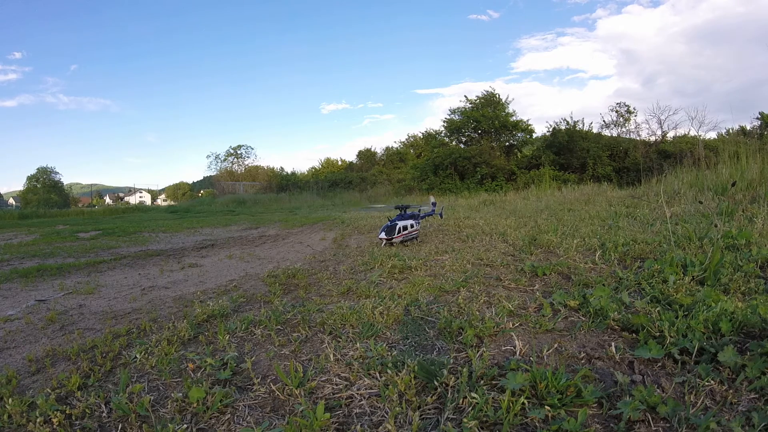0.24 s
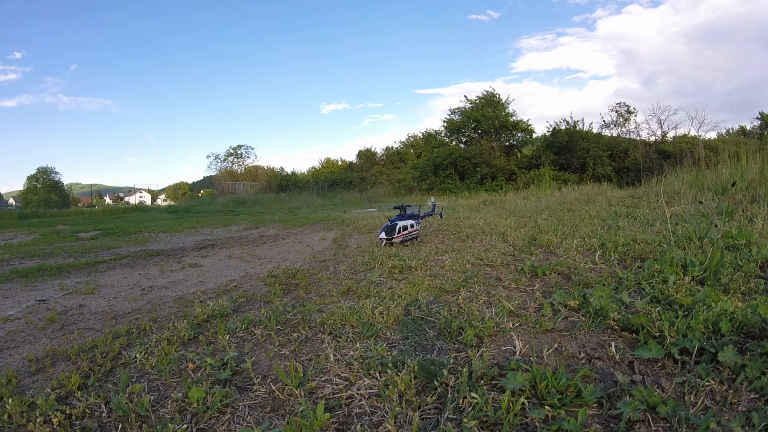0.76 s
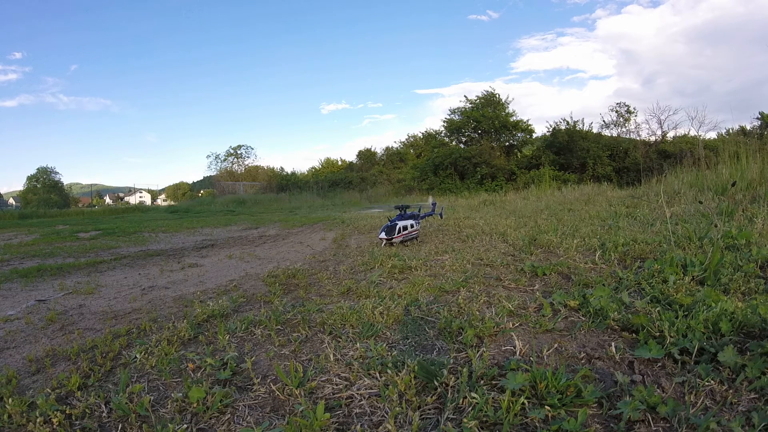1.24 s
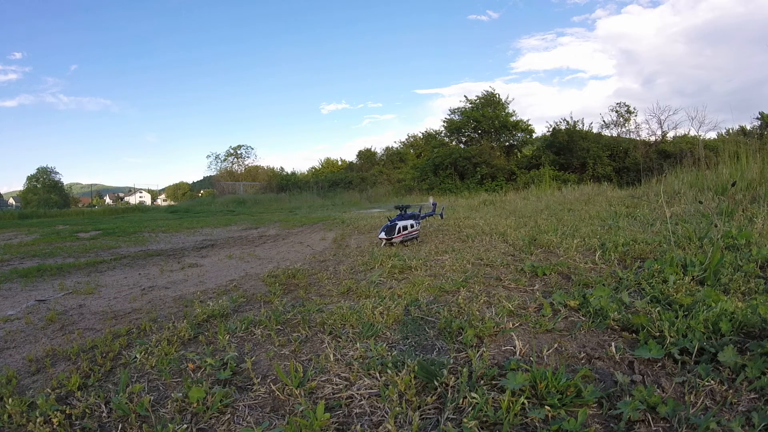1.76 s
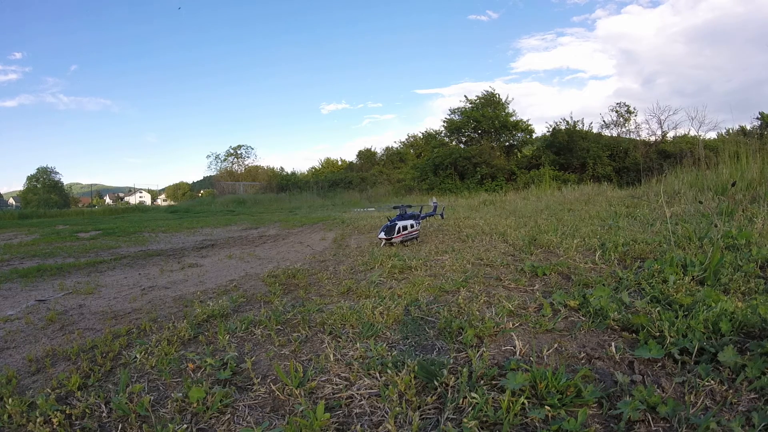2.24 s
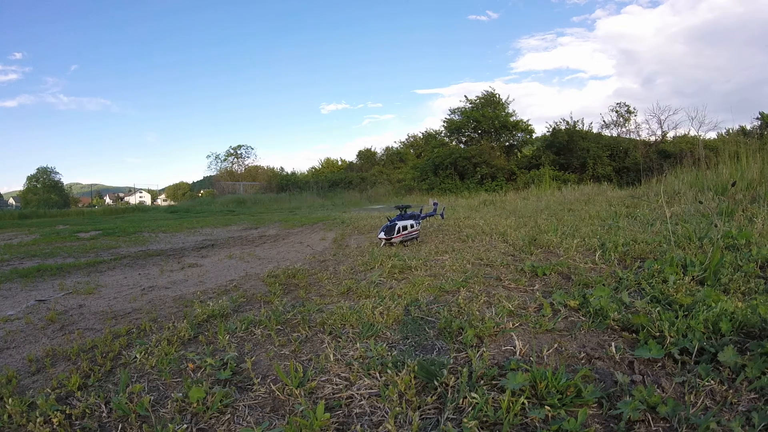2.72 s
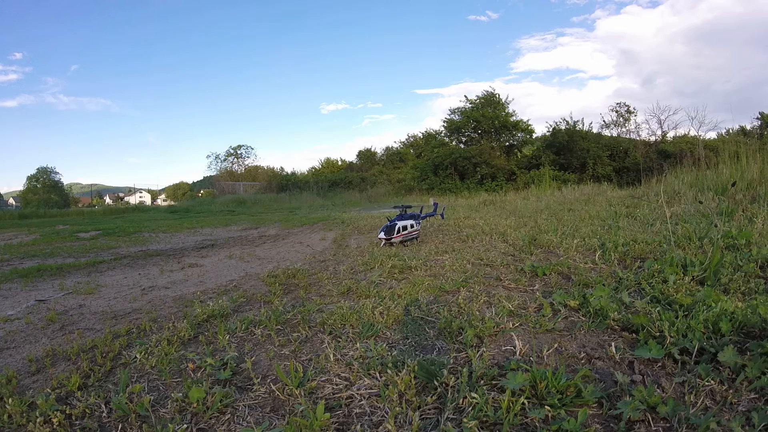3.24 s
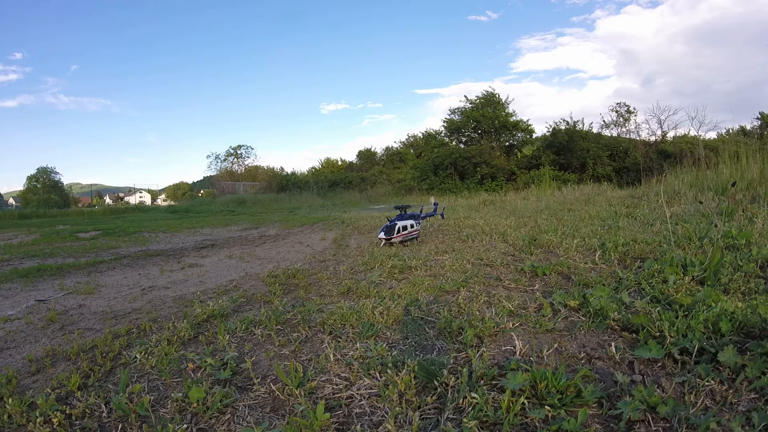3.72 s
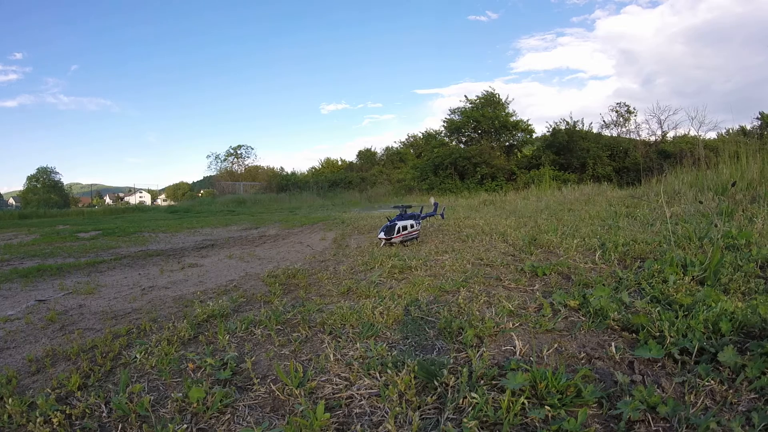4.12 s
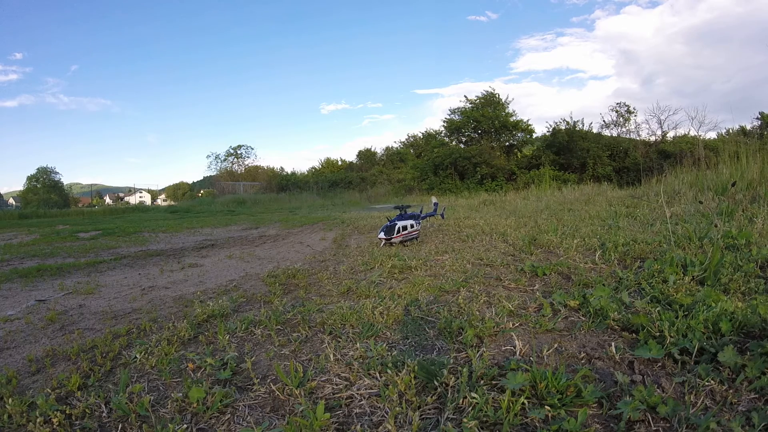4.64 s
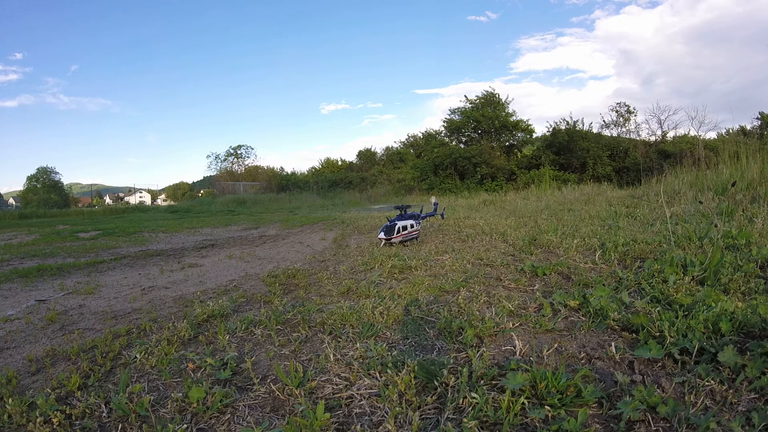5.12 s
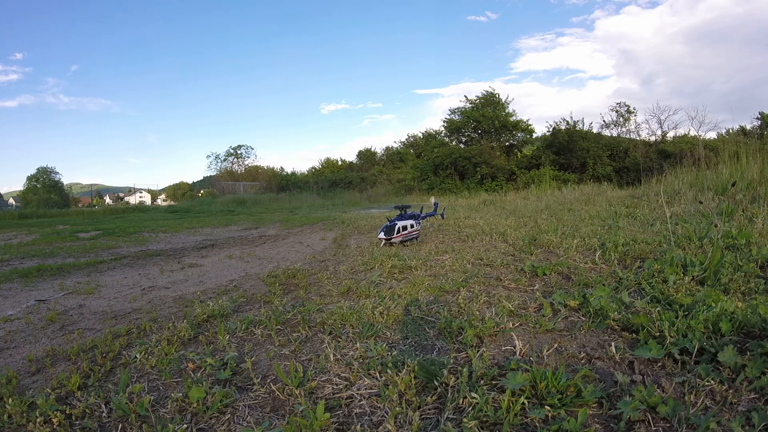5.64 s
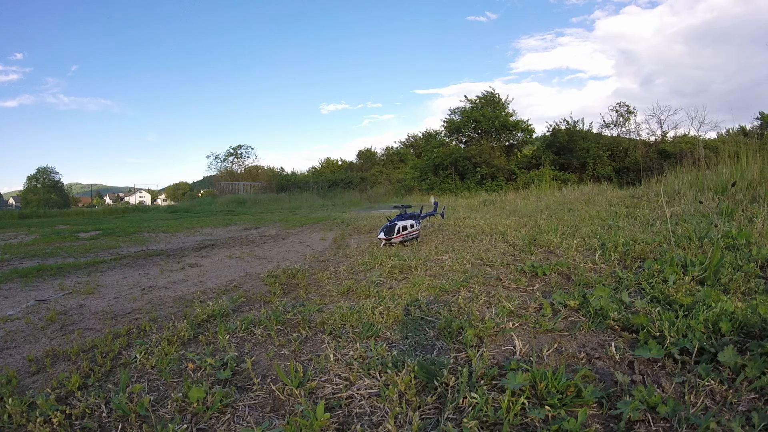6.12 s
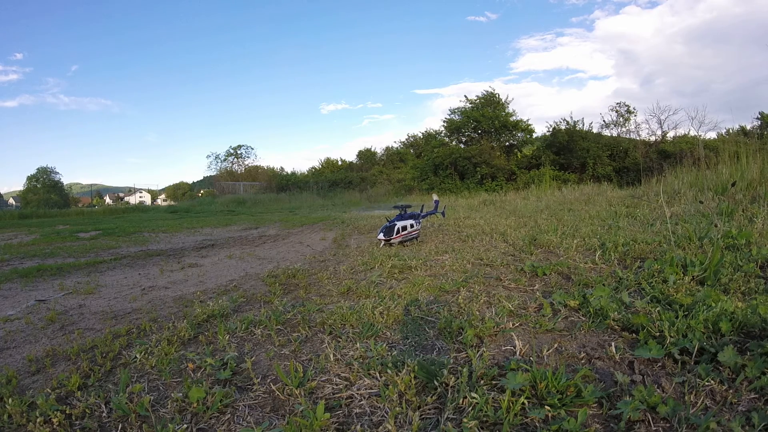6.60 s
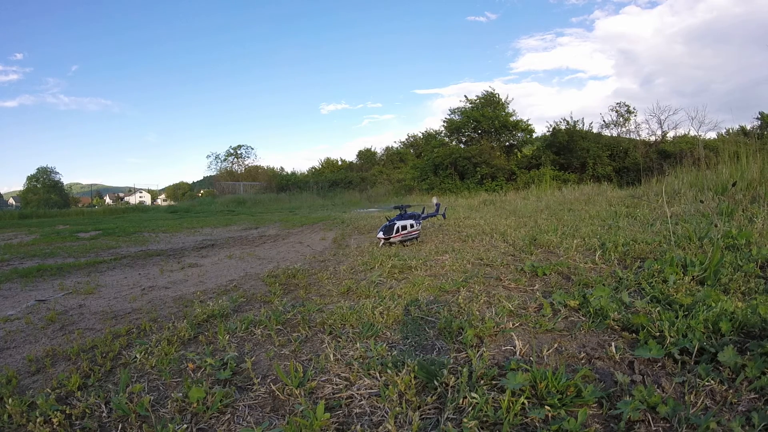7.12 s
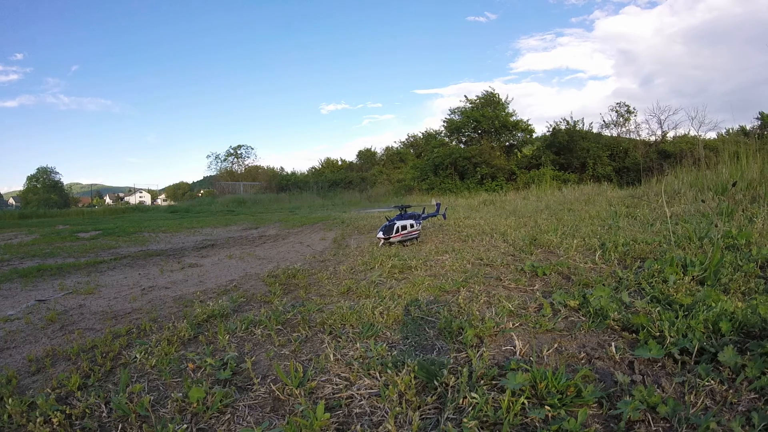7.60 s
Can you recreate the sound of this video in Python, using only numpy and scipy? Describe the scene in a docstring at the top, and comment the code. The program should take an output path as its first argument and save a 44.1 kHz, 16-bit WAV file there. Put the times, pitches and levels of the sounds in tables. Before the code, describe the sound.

A small electric model helicopter spins up on an open grassy field, heard in mono over faint, low wind. From the start its motor is already turning, with a quiet whine that climbs in pitch and grows much louder, rich in overtones. High gear whines, a light body rattle and the airy rush of the blades build with it. At about 2 seconds the fainter, humming tail motor adds a thin high whine that stutters and sags repeatedly until about 5 seconds, slowing slightly. From about 4 to 6 seconds the gears grind harder, with a bright, fluttering hiss. At around 6.5 seconds the main motor levels off, more than an octave above where it began, and holds a steady whine over the rotor wash. Its tone swells slightly in the last half second, just before 8 seconds.

```python
"""A small electric model helicopter spins up on grass, over low wind and a thin controller tone.
The main motor climbs from the start, singing at orders of its shaft speed, loudest at its seven magnet
pairs; blades and gears add noise coloured by the plastic body. At 1.9 s the separate, humming tail motor
takes load, then stutters and slows. The gearbox grinds harder from 3.8 s to about 6 s. Soon after, the
main motor levels off, and its magnet tone swells at the very end."""
import sys
import numpy as np
from scipy import signal
from scipy.fft import rfft, irfft, next_fast_len
from scipy.io import wavfile
from scipy.ndimage import uniform_filter1d, map_coordinates

SR = 44100
rng = np.random.default_rng(int(sys.argv[2]) if len(sys.argv) > 2 else 0)


def int16_out(signal):
    """Quantize to a 16-bit WAV file."""
    q = np.round(np.clip(np.atleast_2d(signal).T, -1, 1) * 32767)
    wavfile.write(sys.argv[1], SR, q.astype(np.int16))


N = 346626
TIME = np.arange(N) / SR
STEP = 64  # samples between updates of slow gains
MAGNET_PAIRS, FULL_SPEED = 7, 77  # main motor; speeds are in turns/s throughout

# noise layers before colouring, by name: level at full speed/(dB per Hz), loss per halving of speed/dB
NOISE_LEVELS = {"wash": (-64.5, 5.4), "rattle": (-76, 4.7), "gears": (-92.5, 3.1), "swish": (-107, 18),
                "chop": (-81, 13), "grind": (-104, 4)}


def amp(db):
    """Gain of a level in dB."""
    return 10 ** (np.asarray(db) / 20)


def along(points, hz):
    """Read (f/Hz, value) points on a log frequency axis."""
    freqs, values = np.transpose(points)
    return np.interp(np.log(hz + 1), np.log(freqs + 1), values)


def curves(rows):
    """One envelope for each column after the time."""
    times, *columns = np.transpose(rows)
    return [np.interp(TIME, times, column) for column in columns]


def wobble(rate):
    """A random drift through rate knots a second."""
    knots = rng.standard_normal(int(N * rate / SR) + 4)
    return map_coordinates(knots, [TIME * rate], order=1)


def tone(cycles):
    """A sine of rms 1 with a random starting phase."""
    return np.sqrt(2) * np.sin(2 * np.pi * (cycles + rng.random()))


def filtered(x, response):
    """Equalise x with a gain given as a function of frequency."""
    size = next_fast_len(N + SR // 4)
    return irfft(rfft(x, size) * response(np.fft.rfftfreq(size, 1 / SR)), size)[:N]


def rush(colour, patchy_db):
    """Noise of 0 dB per Hz with patches of random gain, then coloured."""
    spectrum = signal.stft(rng.standard_normal(N + 512), nperseg=512)[2]
    patches = uniform_filter1d(rng.standard_normal(spectrum.shape), 5, axis=0)
    patches = uniform_filter1d(patches, 10, axis=1)
    white = signal.istft(spectrum * amp(patchy_db * patches / patches.std()), nperseg=512)[1][:N]
    return filtered(white / white.std() * np.sqrt(SR / 2), lambda hz: amp(along(colour, hz)))


def noise_db(name, speed, full_from=FULL_SPEED):
    """Level of a noise layer, growing with shaft speed up to full_from."""
    full_db, loss_db = NOISE_LEVELS[name]
    return full_db + loss_db * np.log2(np.minimum(speed, full_from) / full_from)


def strain(remains=0):
    """Envelope of the spell of heavier grinding: rises to 1, holds, falls to the share that remains."""
    return np.interp(TIME, [3.8, 4.15, 5.68, 6.08], [0, 1, 1, remains])


def ringing(modes, order, speed, floor_db):
    """Gain of one shaft order as it sweeps through a set of resonances, over a floor."""
    coarse = speed[::STEP]
    halvings = np.log2(coarse / FULL_SPEED)
    power = amp(floor_db) ** 2
    for hz, width, db, loss_db in modes:
        detuning = 2 * (order * coarse - hz) / width
        power += (amp(db + loss_db * halvings) / (1 + detuning ** 2)) ** 2
    return np.interp(TIME, TIME[::STEP], np.sqrt(power))


def wind():
    """A low, gently gusting bed of wind."""
    # wind spectrum: f/Hz, level/dB
    colour = [(15, -10), (45, -1), (100, -5), (150, -5), (230, -6), (330, -12.5), (500, -61.5)]
    return amp(-74.5 + 1.8 * wobble(2.1)) * rush(colour, patchy_db=2.5)


def controller(hz, level_db):
    """The speed controller switches at a fixed rate: a thin, steady tone."""
    return amp(level_db + 2.2 * wobble(3.3)) * tone(hz * TIME)


def rotor_noise(speed):
    """Rotor wash, frame rattle and blade chop: bands of noise that grow with speed."""
    # low rush of air from the rotor: f/Hz, level/dB
    wash_colour = [(150, -43.5), (230, -20.5), (330, -6), (390, -7), (480, 1), (550, -6), (640, 2.5),
                   (760, -6), (880, -18), (1100, -48)]
    # rattle of the frame: f/Hz, level/dB
    rattle_colour = [(700, -25), (880, -3), (1150, 0.5), (1350, -2), (1500, -8.5), (1750, -1.5), (1900, -1),
                     (2050, -0.5), (2400, -8.5), (2900, -10.5), (3150, -16.5), (3600, -12.5), (3900, -17.5),
                     (4500, -46.5)]
    # patchy midrange of the blades: f/Hz, level/dB
    chop_colour = [(900, -27.5), (1200, -3.5), (1500, 1), (1900, 3), (2400, -6), (2800, -3), (3100, -9),
                   (3600, -35.5)]
    wash = amp(noise_db("wash", speed) - 0.3 * wobble(2.5)) * rush(wash_colour, patchy_db=1.3)
    rattle = amp(noise_db("rattle", speed)) * rush(rattle_colour, patchy_db=0.6)
    chop = amp(noise_db("chop", speed, full_from=74)) * rush(chop_colour, patchy_db=3.0)
    return wash + rattle + chop


def gear_noise(speed, turns, pulse):
    """The gears hiss and grind, pulsing once a turn; the grinding swells under strain."""
    # hiss of the running gears: f/Hz, level/dB
    hiss_colour = [(3200, -44.5), (3900, -3), (4300, 2.5), (4750, -4), (5300, 0), (5700, -2), (6300, 4),
                   (7000, -2.5), (7500, -4), (8000, 0), (8500, -7.5), (9100, -8.5), (9700, -17.5),
                   (11000, -39.5)]
    # grinding in the gearbox: f/Hz, level/dB
    grind_colour = [(3800, -30), (4150, -4), (4350, 4), (4650, -12), (5450, -12), (5650, 6), (5850, 6),
                    (6050, -8), (6500, -2), (6950, 5), (7300, -5), (8000, 0), (8500, -14), (9500, -40)]
    hiss = amp(noise_db("gears", speed)) * rush(hiss_colour, patchy_db=1.5)
    grind = amp(noise_db("grind", speed) + 14.5 * strain()) * rush(grind_colour, patchy_db=1.0)
    return (1 + pulse * tone(turns)) * (hiss + grind)


def swish(speed, turns, pulse):
    """An airy top that pulses twice a turn, lifts with the grinding and keeps most of that lift."""
    # swish spectrum: f/Hz, level/dB
    colour = [(8500, -32), (9700, -5.5), (11000, 0.5), (12400, 2.5), (13600, -5), (14600, -3.5),
              (15100, -6.5)]
    level_db = noise_db("swish", speed, full_from=45) + 6.5 * strain(remains=.75)
    return amp(level_db) * (1 + pulse * tone(2 * turns)) * rush(colour, patchy_db=1.3)


def stutters(recover_s):
    """The tail drive cuts out for moments and the motor sags: drive gain and share of speed lost."""
    # cut-outs: t/s, gap half-width/s, sag/share of speed
    cutouts = [(1.94, 0.0079, 0.046), (2.11, 0.014, 0.028), (2.26, 0.0073, 0.034), (2.45, 0.02, .012),
               (2.63, 0.014, 0.021), (2.829, 0.009, 0.054), (2.90, 0.012, .02), (3.10, 0.0049, 0.043),
               (3.251, .012, 0.039), (3.60, 0.0091, 0.017), (3.92, 0.013, 0.039), (4.071, 0.0079, 0.01985),
               (4.21, .012, 0.014), (4.35, 0.011, 0.027), (4.68, .015, 0.016), (4.92, 0.019, .015),
               (5.22, 0.019, 0.0089)]
    drive, sag = np.ones(N), np.zeros(N)
    for at_s, gap_s, share in cutouts:
        since = TIME - at_s
        drive *= 1 - .9 * np.exp(-(since / gap_s) ** 2)
        sag += share * np.exp(-np.abs(since) / np.where(since > 0, recover_s, .006))
    return drive, sag


def tail_motor(main_turns, load_at_s, throb, coil_order):
    """The tail motor hums; under load the hum dulls and a coil whine rises, throbbing each main turn."""
    # tail speed before the sags: t/s, speed/(turns/s)
    spin = [(0, 170.4), (1.3, 170.3), (1.6, 168.6), (1.88, 165.5), (1.92, 162), (3.55, 161.5),
            (3.65, 159.5), (4.15, 158.7), (4.3, 155), (4.8, 149.5), (5.15, 149), (5.35, 146.5), (5.6, 151),
            (6.72, 150), (6.76, 136), (6.86, 137), (6.96, 143.5), (7.25, 146), (7.45, 141.5), (7.65, 143),
            (7.86, 143)]
    # tail mix: t/s, hum level/dB, fourth order level/dB, sum tone level/dB
    mix = [(0, -45, -68, -42.5), (.7, -44.5, -51, -54), (1.0, -43.5, -42, -46), (1.3, -45.5, -57, -36.5),
           (1.6, -43.5, -49, -40), (1.86, -42.5, -43, -35), (2.4, -42.5, -45, -47), (3.1, -44, -40, -40.5),
           (4.15, -44, -43, -34.5), (4.8, -48, -47.5, -33), (6.7, -47, -47, -39.5), (6.8, -48.5, -54, -35),
           (7.86, -46.5, -58.5, -40)]
    # hum partials: order, relative level/dB
    hum_orders = [(1, -11), (2, -4.5), (3, 0), (5, -19.5), (6, -15), (8, -18), (10, -18.5), (12, -22)]
    # sum tones, tail orders shifted up by the main motor's magnet tone: order, relative level/dB
    sum_orders = [(2, -1), (4, -17.5)]
    # coil whine under load, by its pitch: f/Hz, level/dB
    coil_levels = [(2450, -67), (2580, -60.5), (2640, -61.5), (2680, -56.5), (2705, -55.5), (2740, -55.5),
                   (2790, -54), (2860, -53), (2915, -52.5)]
    speed = curves(spin)[0]
    hum_db, fourth_db, sum_db = curves(mix)
    drive, sag = stutters(recover_s=.055)
    turns = np.cumsum(speed * (1 - sag + .002 * wobble(25))) / SR
    load = np.clip((TIME - load_at_s) / .04 + .5, 0, 1)

    edge_db = np.interp(load, [0, 1], [2.5, -3])
    out = np.zeros(N)
    for order, db in hum_orders:
        load_db = 0 if order in (1, 3) else edge_db  # the core of the hum ignores the load
        out += amp(hum_db + db + load_db + 1.8 * wobble(8.1)) * tone(order * turns)
    out += amp(fourth_db + 1.5 * wobble(9)) * tone(4 * turns)
    for order, db in sum_orders:
        level_db = sum_db + db - 11.5 * load + 1.4 * wobble(9)
        out += amp(level_db) * tone(order * turns + MAGNET_PAIRS * main_turns)

    coil_db = -70 * (1 - load) + load * along(coil_levels, coil_order * speed)
    coil_gain = drive * (1 + throb * tone(main_turns)) * amp(coil_db + 0.7 * wobble(26))
    return out + coil_gain * tone(coil_order * turns + .04 * wobble(90))


def main_shaft():
    """The main shaft spins up: its speed, counted turns and acceleration (turns/s^2)."""
    # spin-up: t/s, speed/(turns/s)
    spin = [(0, 29.1), (.5, 30.85), (.7, 32.31), (.9, 36.9), (1.1, 40.35), (1.3, 43.05), (1.7, 47.36),
            (1.8, 47.68), (2.0, 50.78), (2.2, 53.6), (2.4, 55.65), (2.6, 57.15), (3.2, 61.0), (3.4, 62.66),
            (4.0, 66.05), (4.6, 69.15), (4.8, 69.9), (5.15, 70.95), (5.6, 73.84), (5.8, 74.52),
            (6.2, 76.58), (6.4, 77.06), (6.7, 77.2), (7.86, 76.78)]
    speed = uniform_filter1d(curves(spin)[0], SR // 20, mode="nearest") + .03 * wobble(20)
    acceleration = uniform_filter1d(np.gradient(speed) * SR, SR // 8, mode="nearest")
    return speed, np.cumsum(speed) / SR, acceleration


def gear_whines(speed, turns, acceleration, tooth_order, runout, flutter):
    """The tooth tone and high whines ring the gear housing and throb once a turn."""
    # housing resonances: f/Hz, width/Hz, level at full speed/dB, loss per halving of speed/dB
    housing = [(3790, 330, -7, 4.5), (6194, 370, 1, -1), (6540, 300, -0.5, 3), (6830, 340, -7, 0.1),
               (7160, 120, -11.5, 3), (7580, 440, -20.5, -11.5), (8050, 240, -5, -0.5),
               (8550, 380, -12, -4), (9500, 900, -27.5, -0.5), (11800, 1300, -24.5, -2.2),
               (13600, 800, -28.5, 0.5)]
    # high whines before the housing colours them: order, level/dB
    high_orders = [(105, -62), (119, -66.5), (126, -70.5), (140, -67.5), (168, -71.5), (196, -69),
                   (224, -53), (231, -63.5), (336, -70)]
    torque_db = 0.2431 * acceleration  # louder while the shaft gains speed
    throb = (1 + runout * tone(turns)) ** 2 / (1 + 2 * runout)
    resonance = ringing(housing, tooth_order, speed, floor_db=-30.5)
    out = amp(-51 + torque_db) * resonance * throb * tone(tooth_order * turns)
    for order, db in high_orders:
        level_db = db + torque_db + 1.5 * wobble(30) + 2.8 * wobble(6.5)
        resonance = ringing(housing, order, speed, floor_db=-39)
        throb = 1 + flutter * tone(turns)
        out += amp(level_db) * resonance * throb * tone(order * turns + .13 * wobble(120))
    return out


def shaft_tones(speed, turns, waver_db, faint_db):
    """Rotor and gears shake the plastic body at whole multiples of the shaft speed."""
    # shaft tones before the body colours them: order, relative level/dB
    orders = [(1, 22), (2, 2.5), (3, 12), (4, 7.5), (5, -2), (6, 3.5), (8, 2.5), (9, 3), (10, -3.5),
              (12, -5), (13, -6.5), (15, -3), (16, -1.5), (20, -2.5), (22, 0.5), (24, -4.5), (26, -8.5),
              (27, -13.5), (29, -8.5), (34, -9.5), (62, 4), (63, 6.5), (64, 2), (70, -3.5), (77, 2),
              (78, -3), (83, -3.5), (84, -2), (86, -0.5), (91, -2.5), (95, -1), (97, -3.5), (98, -2),
              (100, 3.5), (102, 0), (104, 3), (107, 7.5), (110, 0), (117, 8), (121, -1)]
    # response of the body: f/Hz, level/dB
    body = [(30, -23), (80, -8.5), (200, -3.5), (330, 14.5), (480, 11.5), (650, 15), (900, 5), (1100, 6.5),
            (1400, -6), (1700, 4.5), (2000, 10), (2300, 3.5), (2600, 1.5), (3300, -6), (3900, -11),
            (4300, 5), (4800, -7), (5700, 0.5), (6000, 0.5), (6350, 5.5), (6700, 4), (7000, 0), (7500, -2),
            (8100, -3.5), (8700, -7.5), (9500, -19), (12000, -13.5)]
    # how hard the body is shaken: speed/(turns/s), rotor level/dB, gear level/dB
    shaking = [(29, -80.5, -84), (41.7, -75, -90), (48, -69.5, -94), (57.5, -64.5, -78), (64, -61, -74.5),
               (77.9, -57, -72.5)]
    levels = {order: faint_db + 3 * rng.standard_normal() for order in range(72, 128)}  # faint gear bed
    levels.update(orders)
    coarse = speed[::STEP]
    at_speed, *shaken_db = np.transpose(shaking)
    rotor_db, gear_db = (np.interp(coarse, at_speed, db) for db in shaken_db)
    gear_db += 3.5 * strain()[::STEP]
    out = np.zeros(N)
    for order, db in levels.items():
        effort_db = gear_db if order > 50 else rotor_db
        waver_share = min((order / 6) ** 2, 1)  # low orders, straight from the blades, waver least
        drift_db = waver_db * waver_share * wobble(8)[::STEP]
        gain = amp(db + effort_db + along(body, order * coarse) + drift_db)
        out += np.repeat(gain, STEP)[:N] * tone(order * turns)
    return out


def magnet_whine(speed, turns, acceleration, swell_from_s, swell_db_per_s):
    """The lead voice: the magnet pairs sing a rising tone whose overtones cross the frame resonances."""
    # magnet tone at each pitch it sweeps through: f/Hz, level/dB
    sweep_levels = [(204, -47), (232, -43), (272, -53), (285, -47), (310, -58), (331, -42), (344, -30.5),
                    (357, -26), (395, -29.5), (420, -25.5), (462, -17.5), (480, -18.5), (498, -21.5),
                    (515, -19), (523, -18), (532, -16), (541, -15.5)]
    # overtones before the frame colours them: order, level at full speed/dB, loss per halving of speed/dB
    overtones = [(14, -41.5, 1.1), (21, -43, 12), (28, -51, 2.3), (35, -53, 12), (42, -55.5, 12.5),
                 (56, -61.5, 2.7)]
    # frame resonances: f/Hz, width/Hz, level at full speed/dB, loss per halving of speed/dB
    frame = [(445, 60, -7.5, -2.5), (490, 28, -6.5, 0.8), (612, 62, -1.5, -0.5), (704, 85, 0, -0.8),
             (1044.6, 80, 1, 3), (1167, 130, -24.5, -28), (1260, 50, -7.5, 1.5), (1420, 340, -3.5, 15.5),
             (1555, 32, -10, 0.1), (1738, 84, 2, -0.5), (1856, 60, -3, -10), (1994, 120, 5.5, 16.5),
             (2100, 38, -5.5, -4), (2177, 47, -4, -10.5), (2460, 200, 8, 31.5), (2920, 140, -2, -2.5),
             (4300, 340, -5, 1.8)]
    swell_db = swell_db_per_s * np.maximum(TIME - swell_from_s, 0)
    magnet_db = along(sweep_levels, MAGNET_PAIRS * speed) + swell_db + 0.14 * wobble(11)
    out = amp(magnet_db) * tone(MAGNET_PAIRS * turns)
    torque_db = 0.15 * acceleration
    for order, db, loss_db in overtones:
        level_db = db + loss_db * np.log2(speed / FULL_SPEED) + torque_db + 1.6 * wobble(6)
        out += amp(level_db) * ringing(frame, order, speed, floor_db=-20) * tone(order * turns)
    return out


def scene():
    """The mono mix, from the wind bed up to the main motor."""
    speed, turns, acceleration = main_shaft()
    mix = wind() + controller(hz=8070, level_db=-75) + rotor_noise(speed)
    mix += gear_noise(speed, turns, pulse=0.082) + swish(speed, turns, pulse=0.082)
    mix += tail_motor(turns, load_at_s=1.9, throb=0.4, coil_order=18)
    mix += gear_whines(speed, turns, acceleration, tooth_order=112, runout=0.33, flutter=0.23)
    mix += shaft_tones(speed, turns, waver_db=3.0, faint_db=-10.0)
    mix += magnet_whine(speed, turns, acceleration, swell_from_s=7.38, swell_db_per_s=4)
    return mix[None]


def record(dry):
    """The mono microphone keeps nothing above its band limit."""
    return filtered(dry[0], lambda hz: hz < 15150)[None]


dry = scene()
out = record(dry)
int16_out(out)
```